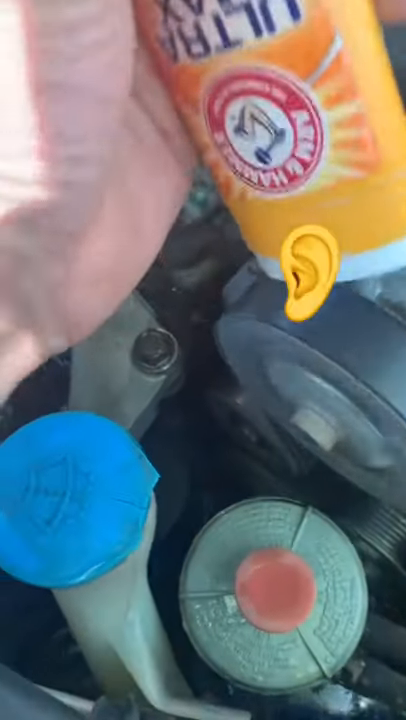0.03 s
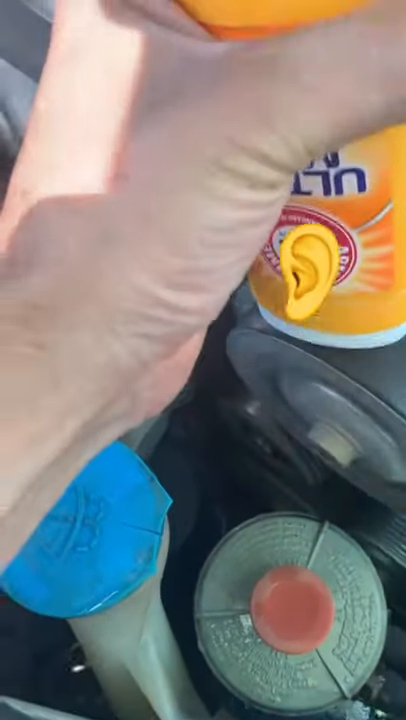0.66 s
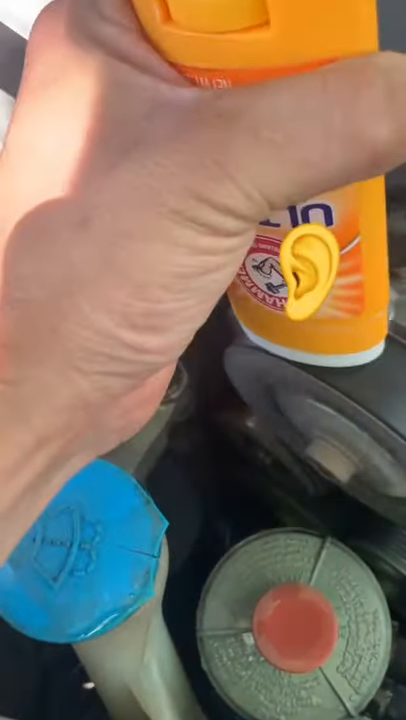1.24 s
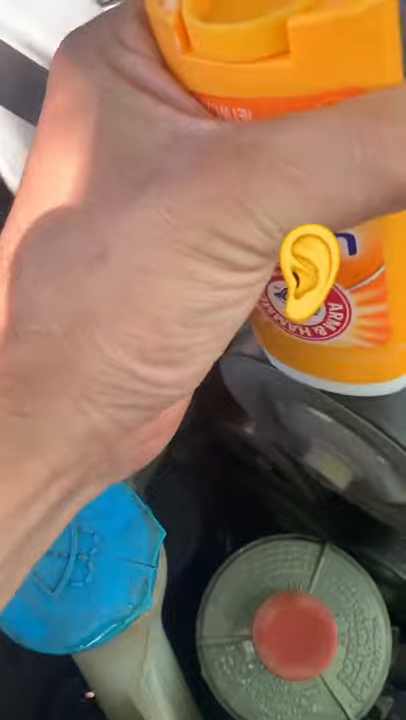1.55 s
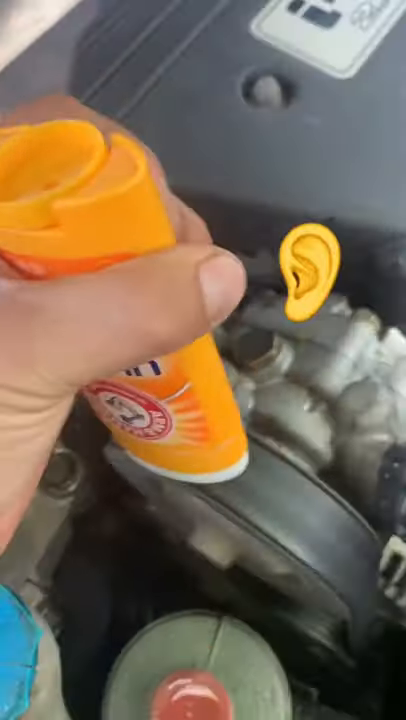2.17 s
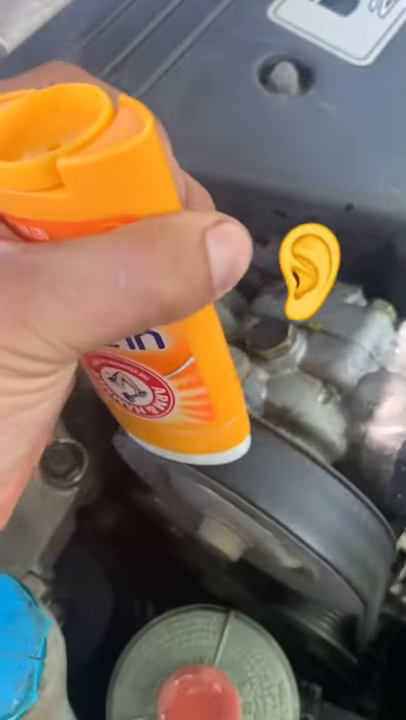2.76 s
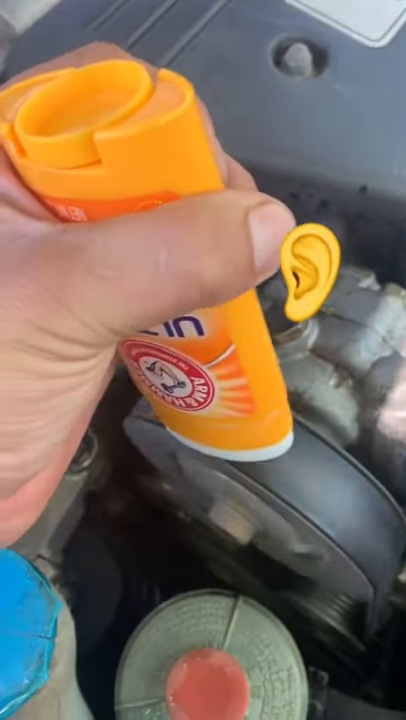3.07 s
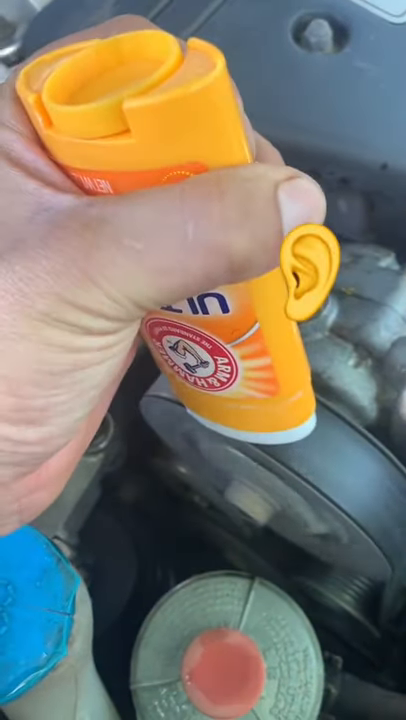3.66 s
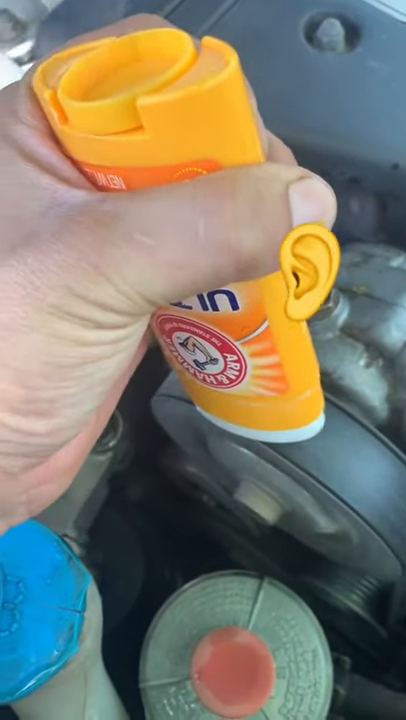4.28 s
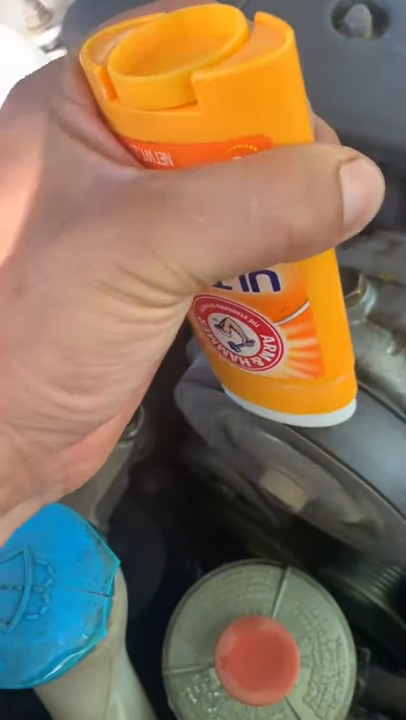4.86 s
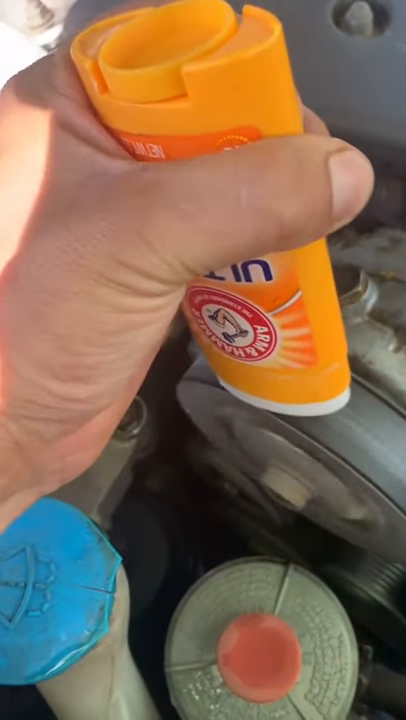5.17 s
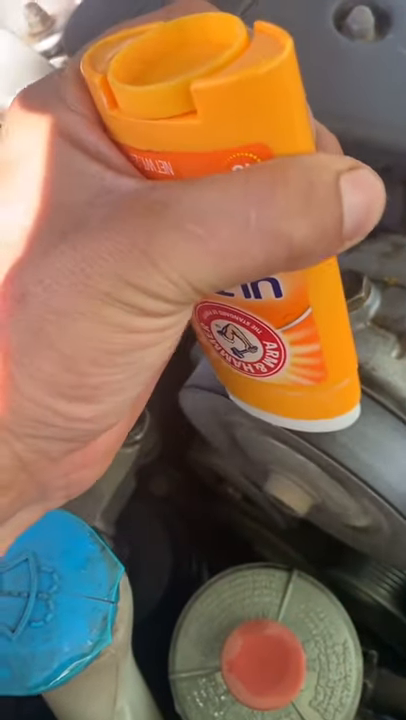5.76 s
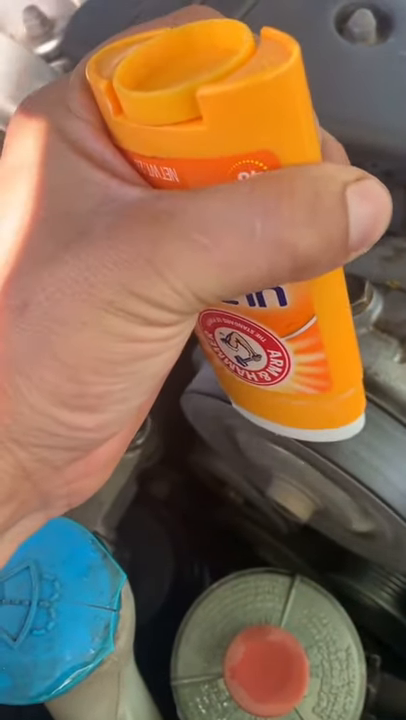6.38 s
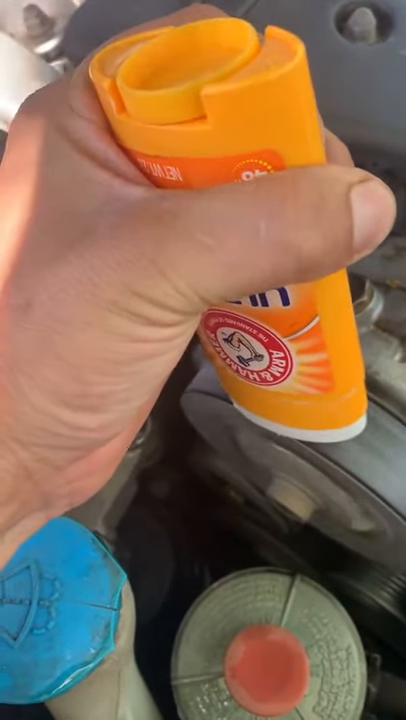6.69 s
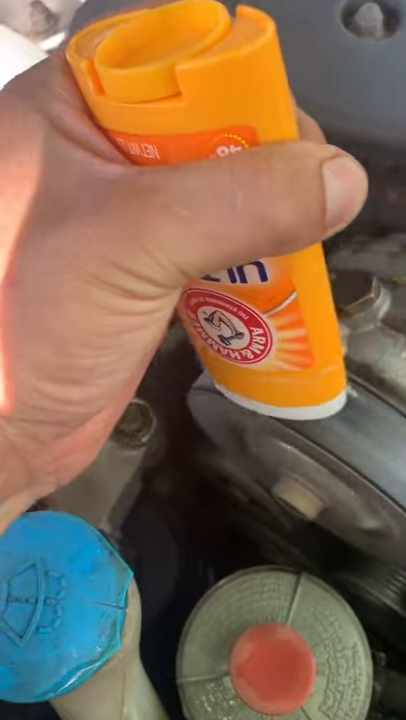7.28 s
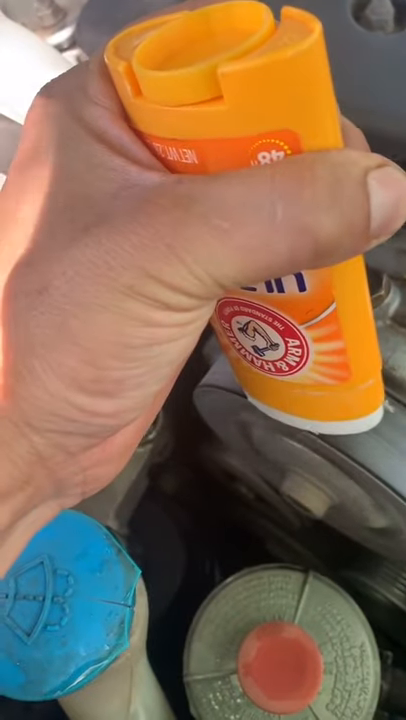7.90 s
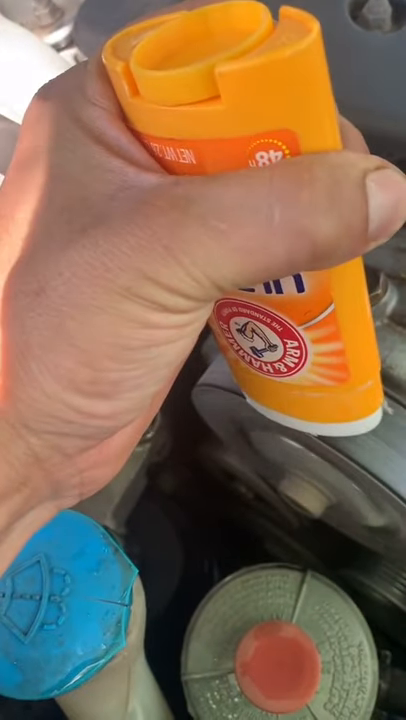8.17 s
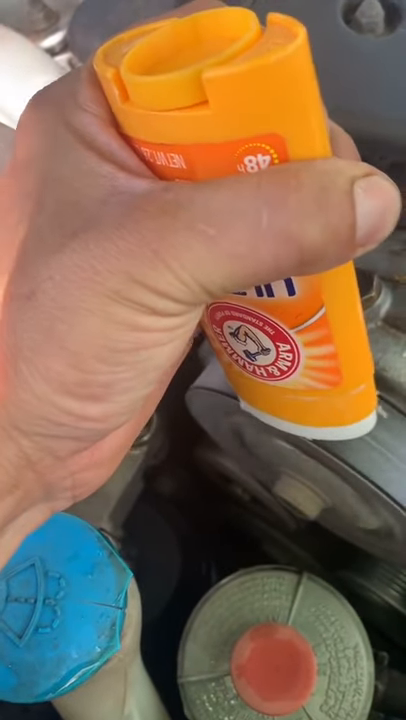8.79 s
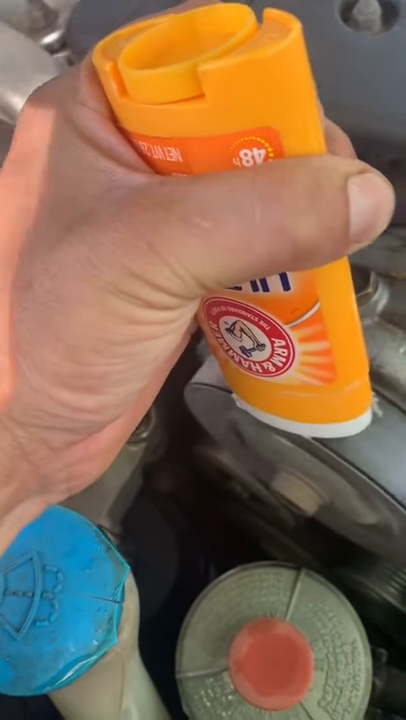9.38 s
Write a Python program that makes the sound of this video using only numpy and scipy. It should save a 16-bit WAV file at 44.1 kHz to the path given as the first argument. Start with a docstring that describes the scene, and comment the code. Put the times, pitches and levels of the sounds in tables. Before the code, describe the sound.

A car engine idles close by throughout, with fast injector ticking, lightly rattling covers, a pulley whirr, a low hum and a steady belt hiss. From the start, the dry drive belt chirps in rapid, irregular, very high squeaks with a thin rasp around them. They are strongest in the first two seconds, weaken, turn sparse after about 4.7 seconds and are gone by 5.5. A wax stick held against the belt scuffs once each lap, five or six times a second, a rough, slightly hollow sound that continues to the end. Now and then the stick catches with a small knock, more often after 4 seconds and most clearly between 7 and 8.5. The engine grows gradually louder from about 2 seconds on. Soft, low puffs of air buffet the microphone around 5.6 to 6.6 seconds, then more strongly from 9 to 9.5.

```python
"""Close above an open engine bay, a four-cylinder car engine idles while a waxy stick is held on its belt.
The dry belt chirps on its pulley in rapid stick-slip squeaks that die away as the wax spreads.
Once a lap a rough stretch of belt scuffs under the stick, and hard catches make the stick knock.
Behind this, injectors tick, covers rattle, pulleys whirr, an accessory hums and the belt hisses.
The engine grows louder as a hand uncovers it; late on, puffs of air buffet the microphone."""
import sys
import numpy as np
from scipy import signal
from scipy.fft import rfft, irfft, next_fast_len
from scipy.io import wavfile
from scipy.ndimage import uniform_filter1d

SR = 44100
rng = np.random.default_rng(int(sys.argv[2]) if len(sys.argv) > 2 else 0)


def store_wav(level_fs):
    """Save 16-bit WAV to argv[1]."""
    pcm = np.round(np.clip(np.atleast_2d(level_fs), -1, 1) * 32767)
    wavfile.write(sys.argv[1], SR, pcm.T.astype(np.int16))


N = 420713
TIME = np.arange(N) / SR
STICK_S = .012   # a belt rib sticks this long before each squeak

# The clear squeaks of the belt. Each row: start in seconds, length in seconds, relative level in dB,
# pitch in Hz.
SQUEAKS = [(0.015, 0.068, -28.5, 7390), (0.05, 0.025, -31.5, 10300), (.088, 0.021, -19.5, 7450),
           (0.114, 0.023, -27, 7700), (0.131, 0.057, -26.5, 8880), (0.197, 0.016, -21, 7530),
           (0.212, 0.036, -24.5, 8050), (0.247, 0.038, -20.5, 7490), (0.313, 0.029, -19.5, 7520),
           (0.343, 0.029, -28.5, 9900), (0.387, 0.044, -20, 7880), (0.452, 0.048, -20, 7410),
           (0.524, 0.025, -21, 7570), (0.551, 0.05, -24.5, 7740), (0.597, 0.026, -17, 7580),
           (0.644, 0.016, -17, 7500), (0.664, 0.03, -20, 7400), (0.727, 0.013, -19.5, 7540),
           (0.741, 0.027, -22, 7060), (0.777, 0.053, -21.5, 7660), (0.841, 0.039, -27, 7750),
           (0.913, 0.037, -21, 7540), (0.96, 0.05, -25, 8300), (1.002, 0.037, -31.5, 9900),
           (1.035, 0.025, -22.5, 7530), (1.095, 0.047, -29.5, 8400), (1.153, 0.016, -21.5, 7670),
           (1.173, 0.0055, -16, 7700), (1.184, 0.017, -31.5, 9150), (1.223, 0.033, -22.5, 7300),
           (1.252, 0.017, -32, 9300), (1.286, 0.048, -21.5, 7390), (1.359, 0.029, -24, 7540),
           (1.443, 0.012, -19.5, 7580), (1.458, 0.0048, -19, 7600), (1.481, 0.012, -16.5, 7800),
           (1.496, 0.033, -22.5, 7350), (1.54, 0.045, -23, 7490), (1.583, 0.013, -29, 7370),
           (1.597, .018, -35, 9600), (1.617, 0.045, -28.5, 7800), (1.759, 0.023, -24.5, 7560),
           (1.801, 0.031, -28, 8830), (1.837, 0.035, -26, 7700), (1.873, 0.018, -21.5, 7550),
           (1.919, 0.045, -35, 8640), (2.005, 0.0083, -20.5, 8200), (2.058, 0.026, -25, 7360),
           (2.127, 0.035, -29.5, 8040), (2.157, 0.014, -25, 8370), (2.196, 0.031, -25.5, 7500),
           (2.268, .029, -30.5, 8480), (2.329, 0.037, -25, 7330), (2.384, 0.042, -26.5, 8370),
           (2.454, .045, -36, 8600), (2.52, 0.034, -37.5, 8500), (2.604, 0.013, -26.5, 8600),
           (2.643, .034, -34.5, 8900), (2.709, 0.023, -25, 8700), (2.75, 0.03, -32, 8860),
           (2.827, 0.023, -29, 8600), (2.891, 0.034, -27, 7700), (2.965, 0.03, -28.5, 8600),
           (3.033, 0.034, -29, 8040), (3.044, .005, -25, 7670), (3.099, 0.026, -31, 8500),
           (3.151, 0.035, -28.5, 8120), (3.189, .006, -21, 7480), (3.21, 0.034, -30, 8540),
           (3.244, 0.005, -20.5, 7640), (3.423, 0.04, -28, 8200), (3.468, 0.052, -35, 9100),
           (3.542, 0.018, -27, 7800), (3.594, 0.014, -21.5, 7420), (3.697, 0.019, -31, 10000),
           (3.735, 0.023, -22, 7680), (3.794, 0.049, -29.5, 8230), (3.872, 0.03, -34, 8800),
           (3.951, 0.014, -22.5, 7730), (3.966, 0.063, -28, 7980), (4.028, 0.0082, -24, 9110),
           (4.118, 0.038, -33, 8500), (4.168, 0.018, -24.5, 7160), (4.201, .012, -36, 9700),
           (4.237, 0.018, -23.5, 9800), (4.254, 0.0073, -21, 7320), (4.305, .005, -21, 8000),
           (4.313, 0.027, -25.5, 8300), (4.38, 0.023, -22.5, 7660), (4.447, 0.012, -23.5, 7500),
           (4.529, 0.018, -27, 7660), (4.566, 0.012, -24, 7550), (4.587, 0.007, -18, 7700),
           (4.626, 0.042, -27.5, 7800), (4.824, 0.048, -38, 7930), (5.169, 0.014, -32.5, 9300),
           (5.348, 0.0051, -22.5, 7510), (5.402, 0.029, -32, 8500)]


def slips(firm_db=-25.2, strays_per_s=26, stray_s=0.0218, fade_db_per_s=5, waxed_s=4.3):
    """Stick-slip motion: ribs grip and let go. Lists squeaks, releases and strays as SQUEAKS rows."""
    # as a firm squeak lets go, the rib jumps to a higher, fainter note
    release_hz = 9370 + 490 * rng.uniform(-1.14, 1, size=200)
    releases = [(start + length, min(0.0223, length), db - 13.5, hz)
                for (start, length, db, _), hz in zip(SQUEAKS, release_hz) if db > firm_db]
    # faint stray slips in the pauses die away as the wax spreads
    starts, lengths = np.transpose(SQUEAKS)[:2]
    late, higher = rng.uniform(-1, 1, size=(200, 2)).T
    times = (np.arange(len(late)) + 1 + late / 2) / strays_per_s
    strays = []
    for s, hz in zip(times, 9400 + 544 * higher):
        crowded = np.any((s + stray_s + STICK_S > starts) & (s < starts + lengths / 2))
        if s < waxed_s and not crowded:
            strays.append((s, stray_s, -28.5 - fade_db_per_s * s, hz))
    return SQUEAKS + releases + strays


# Friction noise round a squeak. Each row: frequency in Hz, relative spectral level in dB.
RASP_SPECTRUM = [(4500, -39), (5600, -30), (6500, -10), (7200, 29.5), (8200, 26), (9300, 13), (10100, 6),
                 (11300, -35), (12400, -30), (13500, 13), (14000, 6), (14700, -14), (15500, -7)]


def squeaks(attack_s=0.0029, edge_s=0.0022, light_above_hz=8950, flick_hz_per_s=37000):
    """Self-excited oscillation: each slip sets a rib squealing; uneven grip adds width and rasp."""
    tone, grip = np.zeros(N), np.zeros(N)
    t = np.arange(2 ** 12) / SR
    offset_hz = np.fft.fftfreq(len(t), 1 / SR)
    for (start, length, db, hz), draws in zip(slips(), rng.standard_normal(size=(300, 2, len(t)))):
        kicks = draws[0] + 1j * draws[1]
        # a firm slip locks into a narrow band, which widens for weaker slips and as the wax spreads
        half_width_hz = 0.55 * (430 + 66 * max(-21.5 - db, 0) + 27 * start)
        swing = level_out(np.fft.ifft(kicks / np.hypot(1, (offset_hz / half_width_hz) ** 2)), 0.027)
        # a lightly gripping rib squeals high and flicks upwards
        pitch = hz + (hz > light_above_hz) * flick_hz_per_s * (t - length / 2)
        squeal = swing * np.exp(2j * np.pi * np.cumsum(pitch) / SR)
        sag_db = -0.5 * (np.minimum(t / length, 1) - .5)
        ramps = np.minimum(t / min(attack_s, length / 2), (length + edge_s - t) / edge_s)
        envelope = from_db(db + sag_db) * np.clip(ramps, 0, 1)
        at = max(int((start - edge_s) * SR), 0)
        tone[at:at + len(t)] += np.sqrt(2) * envelope * (squeal + from_db(-23) * squeal ** 2).real
        grip[at:at + len(t)] += envelope ** 2
    chatter = rms_one(from_db(4 * drift(700)))
    rasp = np.sqrt(grip) * chatter * noise(RASP_SPECTRUM)
    return from_db(-3.5) * tone + from_db(-8) * rasp


# Three pulley resonances and, last, a thin, very high ring that sounds with the squeaks.
# Each row: frequency in Hz, bandwidth in Hz, gain in dB.
SQUEAK_RINGS = [(7310, 113, -3.5), (7550, 150, -7.5), (9020, 510, -1), (15340, 60, 9)]


def squeak_ring(squeal):
    """Resonance: narrow bands ring along with the squeaks."""
    return sum(resonate(squeal, [mode]) for mode in SQUEAK_RINGS)


# Brief, clean high whistles. Each row: start in seconds, length in seconds, level in dB.
CLEAN_WHISTLES = [(2.695, 0.033, -26), (2.894, 0.034, -25), (2.951, 0.066, -31), (3.04, 0.014, -31),
                  (3.088, .036, -42), (3.149, 0.026, -29)]


def clean_whistle(pitch_hz=7752, edge_s=0.0037, octave_db=-22):
    """Gated harmonic tone: brief, clean high whistles on one steady note among the squeaks."""
    envelope = sum(from_db(db) * np.clip(np.minimum(TIME - s, s + length - TIME) / edge_s + .5, 0, 1)
                   for s, length, db in CLEAN_WHISTLES)
    phase = 2 * np.pi * pitch_hz * TIME
    return np.sqrt(2) * envelope * (np.sin(phase) + from_db(octave_db) * np.sin(2 * phase))


# The ribs rub until the wax takes hold. Each row: time in seconds, level in dB.
RUB_LEVEL = [(0, -45), (.6, -46), (1.7, -46), (2.4, -42.5), (3.3, -48), (4.3, -37), (4.75, -53), (5.6, -62)]
# The noise of that rubbing. Each row: frequency in Hz, relative spectral level in dB.
RUB_SPECTRUM = [(5600, -42), (6800, -7), (7800, 3.5), (8500, 7), (9400, -2), (10100, 3), (10700, -39),
                (12000, -40)]


def rubbing(grab_db=4.0, grain_db=3.5, stuck_db=-12):
    """Dry friction: ribs rasp on the pulley in tiny uneven grabs, hushed while a rib sticks."""
    level_db, = in_time(RUB_LEVEL)
    stuck = np.zeros(N)
    for start, *_ in SQUEAKS:
        stuck[max(int((start - STICK_S) * SR), 0):int(start * SR)] = 1
    grabs = rms_one(from_db(grab_db * drift(70) + grain_db * drift(800)))
    return from_db(level_db + stuck_db * uniform_filter1d(stuck, size=90)) * grabs * noise(RUB_SPECTRUM)


# A rib snaps free. Each row: time in seconds, relative peak level in dB.
SNAPS = [(0.0836, -44), (1.4426, -42), (1.4815, -49), (3.046, -39), (3.741, -41), (3.9679, -37),
         (4.1749, -36.5), (4.2567, -35), (4.3044, -39), (4.531, -33.5), (4.5885, -36.5)]


def snaps(rise_s=0.0025, fall_s=0.014):
    """Elastic release: the rubber lets go with a short bright scratch."""
    force = swells([(s + rise_s, db, rise_s, fall_s) for s, db in SNAPS])
    scratch = noise([(5000, -14), (7500, 4), (11000, -1.5), (12400, -3), (13500, 3), (15500, -14)])
    return from_db(8) * force * scratch


# The rough stretch of belt meets the stick once a lap. Each row: time of the peak in seconds, relative
# peak level in dB, rise and fall time constants in seconds, brightness in dB.
SCUFFS = [(.018, -30.5, .009, .039, -2), (.205, -29, 0.019, 0.0089, -3), (.379, -33, .006, 0.039, 2),
          (.588, -36.5, 0.013, 0.011, 7), (.742, -32.5, .022, 0.017, 0.5), (.913, -26, .017, .02, 1.5),
          (1.075, -34, .006, .051, -2), (1.262, -26.5, 0.0068, 0.019, -3), (1.457, -28, 0.028, .012, 1.5),
          (1.622, -31.5, 0.034, 0.033, 1), (1.781, -29.5, .005, 0.035, -4.5), (1.97, -30.5, .021, 0.03, 1),
          (2.162, -33.5, .043, .025, -2), (2.322, -27.5, 0.014, .019, -2.5), (2.496, -28.5, .013, 0.014, 1),
          (2.682, -24.5, .01, 0.014, -1), (2.859, -25, .019, .023, -1), (3.039, -27.5, 0.023, .024, -4),
          (3.197, -27.5, .015, 0.038, 0), (3.385, -28, 0.02, 0.047, 1.5), (3.559, -24.5, 0.016, 0.019, 0),
          (3.745, -27.5, .023, .024, 1.5), (3.931, -28, 0.027, .013, 4), (4.099, -27.5, .03, .018, 0),
          (4.279, -28.5, .032, 0.039, -2.5), (4.456, -25, 0.011, 0.018, -3), (4.61, -28.5, .011, .033, 1),
          (4.787, -26.5, .005, .024, -1), (4.979, -24.5, .006, 0.017, -2), (5.159, -23.5, 0.02, 0.02, -2),
          (5.345, -29.5, .037, .018, 6), (5.516, -27.5, .012, .018, -0.5), (5.703, -29.5, .035, .012, -1),
          (5.862, -29, 0.029, 0.028, 1), (6.054, -27, 0.038, .008, 2), (6.204, -25, .008, .028, 2),
          (6.405, -33.5, .034, 0.019, 4), (6.585, -24.5, 0.024, 0.012, 0), (6.757, -25.5, .024, .03, 1),
          (6.931, -23.5, .006, 0.017, -1), (7.102, -25, .022, 0.025, 4), (7.303, -31.5, 0.051, .028, 0),
          (7.47, -27.5, 0.012, .018, -3), (7.642, -23.5, .021, 0.034, -0.5), (7.808, -22, 0.024, 0.03, -3),
          (7.991, -24.5, 0.023, 0.026, -1), (8.183, -24, 0.028, 0.016, -4), (8.36, -21, .011, 0.01, 2),
          (8.54, -28, 0.046, .036, -3), (8.708, -27, 0.033, .045, 4), (8.868, -29.5, .017, .018, -6),
          (9.048, -29.5, 0.016, .044, 7), (9.237, -22, 0.0089, .025, -2.5), (9.429, -26.5, .028, .018, 2)]
# The modes of the stick and its holder. Each row: frequency in Hz, bandwidth in Hz, relative gain in dB.
STICK_MODES = [(407, 71, -11.5), (658, 30.6, -2.5), (877.6, 33, 4.5), (988, 65, 1), (1120, 51, -6.5),
               (1250, 61, -5), (1319, 51, -2), (1650, 106, -6), (2198, 110, -15), (2685, 62, -16)]
# Dry friction noise of a scuff. Each row: frequency in Hz, relative spectral level in dB.
GRIT_SPECTRUM = [(200, -6), (400, -17), (750, -29), (1500, -35), (3000, 3.5), (4400, -1), (5100, -16),
                 (6300, 13.5), (7600, 4), (9500, -2), (11000, 2), (12500, -2), (15500, -35)]


def scuffs(slip_hz=440, jitter=.1, bright_above_hz=945, jolt_rise_s=0.0031, jolt_fall_s=0.0079):
    """Frictional excitation: the stick judders on the belt in uneven slips, ringing with its holder."""
    # the force swells once a lap and jolts at each catch
    jolts = [(s, db - 2.5, jolt_rise_s, jolt_fall_s) for s, db in CATCHES]
    force = swells([row[:4] for row in SCUFFS] + jolts)
    cycles = np.floor(np.cumsum(slip_hz * (1 + jitter * drift(250))) / SR)
    pulses = np.diff(cycles, prepend=0) * from_db(3.8 * rng.standard_normal(N))
    judder = rms_one(pulses) + 0.93 * rng.standard_normal(N)
    brightness = from_db(in_time(SCUFFS)[-1] + .5)
    modes = ((-1) ** k * resonate(judder, [mode]) * (brightness if mode[0] > bright_above_hz else 1)
             for k, mode in enumerate(STICK_MODES))
    ringing = level_out(sum(modes), 0.023)
    # the resonances shift a little as the stick rocks in the hand
    ringing = np.interp(TIME + np.cumsum(.018 * drift(9)) / SR, TIME, ringing)
    grit = noise(GRIT_SPECTRUM) * rms_one(from_db(0.65 * drift(500)))
    return force * (from_db(0.98) * ringing + from_db(-10.5) * grit)


# The stick catches hard on the belt. Each row: time in seconds, relative level in dB.
CATCHES = [(0.912, -28.5), (1.621, -31), (2.31, -25), (2.859, -35.5), (4.089, -26.5), (4.269, -26.5),
           (4.427, -24.5), (4.784, -28), (4.793, -31), (4.971, -23), (5.492, -22.5), (5.701, -33),
           (6.385, -26), (7.132, -22.5), (7.313, -22.5), (7.454, -18.5), (8.163, -24), (8.325, -23.5),
           (9.208, -34)]


def knocks():
    """Impulse response: each catch strikes the stick once, and its modes decay freely."""
    s, db = np.transpose(CATCHES)
    blows = np.zeros(N) + 1e-18
    blows[(s * SR).astype(int)] = from_db(db + 27)
    return resonate(blows, STICK_MODES)


# The engine comes forward as the hand uncovers it. Each row: time in seconds, relative level in dB.
ENGINE_LEVEL = [(0.0, -37.5), (0.16, -38.5), (2.13, -39.5), (3.0, -37), (8.61, -32), (9.54, -31)]
# Mechanical noise of the engine. Each row: frequency in Hz, relative spectral level in dB.
ENGINE_SPECTRUM = [(20, -20), (45, -10), (65, 10.5), (110, -2), (200, 0.5), (310, -5.5), (400, 1),
                   (580, 1.5), (780, -3), (950, 0), (1120, 0), (1290, 1), (1420, 0), (1600, 2),
                   (1900, -0.5), (2450, -7.5), (2900, -7.5), (4400, -9), (5100, -40)]
# Turning shafts and pulleys. Each row: turns per second, modulation depth in dB.
SHAFTS = [(16.8, 2.0), (44.1, 1.3), (56.5, 1.3), (73.3, 1.5)]
# The modes of the engine's covers. Each row: frequency in Hz, bandwidth in Hz, relative gain in dB.
COVER_MODES = [(556.5, 11.3, 3.5), (682, 75, -3), (950.6, 33, 2.5), (1260, 115, -11), (2674, 21, -12.5)]


def engine(clatter_db=2.5):
    """Amplitude modulation: over broadband noise, the shafts rattle the covers in their own rhythms."""
    level_db, = in_time(ENGINE_LEVEL)
    throb = from_db(sum(db * np.sin(2 * np.pi * turns * TIME) for turns, db in SHAFTS))
    body = noise(ENGINE_SPECTRUM) * from_db(drift(60))
    rattle = rng.standard_normal(N) * throb * from_db(clatter_db * drift(150))
    covers = rms_one(resonate(rattle, COVER_MODES))
    return from_db(level_db) * (from_db(-2) * body + from_db(-7) * covers)


# The idle speed sags slightly under the drag. Each row: time in seconds, firings per second.
FIRING_RATE = [(0, 26.7), (5.8, 26.7), (6.6, 26.54), (7.4, 26.68), (8.6, 26.68), (9.54, 26.54)]
# Injector and valve clicks. Each row: position as a fraction of the firing period, relative level in dB.
CLICKS = [(0.01, -2), (0.26, -6), (0.68, -5.5)]
# The noise of a click. Each row: frequency in Hz, relative spectral level in dB.
CLICK_SPECTRUM = [(1800, -16), (2700, 0.5), (3600, -4.5), (4500, 4.5), (5100, -33), (6200, -5), (7500, 3),
                  (9000, 7), (10000, 9.5), (10600, -16), (11300, -6), (11800, -40), (12800, -40),
                  (13400, 0), (15500, 4)]


def injectors(first_s=0.0127, tick_hz=4332, tick_fall_s=0.011, click_fall_s=.004):
    """Periodic impacts: each firing brings dry clicks and a ringing tick from four unequal injectors."""
    firings_per_s, = in_time(FIRING_RATE)
    firing, phase = np.divmod(np.cumsum(firings_per_s) / SR - first_s * firings_per_s, 1)
    cylinder_db = np.array([-3.0, -3.5, 1.5, -2.0])[firing.astype(int) % 4]
    strength = from_db(cylinder_db + 2.0 * drift(20))
    strike = rms_one(strength * np.exp(-phase / firings_per_s / tick_fall_s))
    ticks = uniform_filter1d(strike, size=40) * narrow_noise(tick_hz, width_hz=70, steady_s=0.0056)
    decays = sum(from_db(db) * np.exp(-((phase - position) % 1) / firings_per_s / click_fall_s)
                 for position, db in CLICKS)
    clicks = rms_one(strength * decays) * noise(CLICK_SPECTRUM)
    # these come forward faster than the rest as the hand uncovers the engine
    level_db, = in_time(ENGINE_LEVEL)
    heard_db = level_db.mean() + 1.24 * (level_db - level_db.mean())
    return from_db(heard_db) * (from_db(-17) * ticks + from_db(-10.5) * clicks)


# The hum of engine and accessories. Each row: frequency in Hz, relative level in dB.
HUM_LINES = [(26.7, -60), (53.4, -57.5), (80.1, -57), (250, -49), (372, -54.5), (555, -58.5)]


def hum(wander=0.00264):
    """Line spectrum: steady rotation gives tones, which waver slightly in level and pitch."""
    level_db, = in_time(ENGINE_LEVEL)
    uncovered = from_db(0.94 * (level_db - level_db.mean()))
    lines = np.zeros(N)
    for hz, db in HUM_LINES:
        amplitude = from_db(db + drift(5.8))
        lines += amplitude * np.sin(2 * np.pi * hz * np.cumsum(1 + wander * drift(6)) / SR)
    return np.sqrt(2) * uncovered * lines


# The resonance of a pulley bearing. Its one row: frequency in Hz, bandwidth in Hz, relative gain in dB.
BEARING_MODE = [(1660, 88, 0)]


def bearing_whirr():
    """Narrow-band resonance: a pulley bearing whirrs evenly."""
    level_db, = in_time(ENGINE_LEVEL)
    hz, width_hz, _ = BEARING_MODE[0]
    return from_db(level_db - 8.5) * narrow_noise(hz, width_hz, steady_s=0.051)


# Two faint, thin, very high steady tones. Each row: frequency in Hz, relative level in dB.
HIGH_TONES = [(11197, -19.5), (13954, -14.5)]


def high_tones():
    """Pure tones: two faint sinusoids waver in strength and grow with the overall level."""
    level_db, = in_time(ENGINE_LEVEL)
    tones = sum(from_db(db - 0.5 * drift(2.99)) * np.sin(2 * np.pi * hz * TIME) for hz, db in HIGH_TONES)
    return np.sqrt(2) * from_db(level_db + 0.97 * (level_db - level_db.max())) * tones


# The belt's hiss and its highest fizz. Each row of both: frequency in Hz, relative spectral level in dB.
HISS_SPECTRUM = [(5100, -22.5), (5700, -0.5), (6400, 0), (7400, 5.5), (8100, 0.5), (9000, 4), (9900, 3),
                 (10500, -29), (11300, 2.5), (12400, -86)]
FIZZ_SPECTRUM = [(12400, -42), (13300, 5.5), (14000, -1), (14700, 3), (15500, 5.5)]
# The strength of the fizz. Each row: time in seconds, relative level in dB.
FIZZ_LEVEL = [(0.0, -51.5), (0.74, -49), (1.09, -56.5), (3.4, -57), (4.09, -47), (5.61, -50), (7.65, -42.5),
              (9.54, -44.5)]


def belt_hiss():
    """Sliding friction: the ribs run hissing through the pulley grooves."""
    level_db, = in_time(ENGINE_LEVEL)
    fizz_db, = in_time(FIZZ_LEVEL)
    hiss = from_db(level_db - 5.5) * noise(HISS_SPECTRUM)
    fizz = from_db(fizz_db + 5.8) * noise(FIZZ_SPECTRUM)
    return (hiss + fizz) * from_db(drift(120))


# Puffs of air. Each row: time of the peak in seconds, level in dB, Gaussian half-width in seconds.
BUFFETS = [(5.627, -37, .014), (5.99, -42, .022), (6.557, -34.5, 0.018), (6.615, -40, .012),
           (8.92, -48, 0.018), (8.961, -31, 0.01), (9.003, -35, 0.015), (9.241, -24, 0.0083),
           (9.279, -26, .011), (9.335, -36, .02), (9.53, -34, 0.017)]
# The rumble of a puff. Each row: frequency in Hz, relative spectral level in dB.
BUFFET_SPECTRUM = [(20, -31), (50, -10), (80, -6), (140, -12.5), (250, -22), (450, -44), (1000, -80)]


def buffets(side_db=-8):
    """Turbulent pressure: soft low puffs of air, a little different at each microphone port."""
    gusts = sum(from_db(db) * np.exp(-.5 * ((TIME - s) / half) ** 2) for s, db, half in BUFFETS)
    mid, side = (level_out(noise(BUFFET_SPECTRUM), 0.025) for _ in range(2))
    return gusts * (mid + from_db(side_db) * side * [[1], [-1]])


def engine_bay(x, width, spread_s):
    """Reflection: echoes reach the two sides differently, each frequency with its own short delay."""
    size = next_fast_len(N + 4096)
    hz = np.arange(size // 2 + 1) * SR / size
    knots = np.arange(0, SR / 2, 25)
    delay_s = spread_s * np.interp(hz, knots, rng.uniform(.2, 1, len(knots)))
    scattered = irfft(rfft(x, size) * np.exp(-2j * np.pi * np.cumsum(delay_s) * SR / size), size)[:N]
    return x + colour(scattered, width) * [[1], [-1]]


def from_db(db):
    """The amplitude ratio of a level in decibels."""
    return 10 ** (np.asarray(db) / 20)


def rms_one(x):
    """Normalisation to unit mean power."""
    return x / np.sqrt(np.mean(np.abs(x) ** 2) + 1e-20)


def level_out(x, seconds):
    """Amplitude limiting, as friction limits its own swing: the short-term power stays near 1."""
    return x / np.sqrt(uniform_filter1d(np.abs(x) ** 2, max(int(seconds * SR), 2)) + 1e-12)


def in_time(rows):
    """Linear interpolation of each column after the time column, at every sample."""
    s, *columns = np.transpose(rows)
    return [np.interp(TIME, s, column) for column in columns]


def drift(per_s):
    """Random modulation of unit power, with per_s new values a second."""
    knots = rng.standard_normal(N // 20)
    return rms_one(np.interp(TIME * per_s, np.arange(len(knots)), knots))


def swells(rows):
    """Exponential growth and decay. Each row: peak in seconds, level in dB, rise and fall in seconds."""
    force = np.zeros(N)
    for s, db, rise, fall in rows:
        near = slice(max(int((s - 10 * rise) * SR), 0), int((s + 10 * fall) * SR))
        force[near] += from_db(db) * np.exp(-np.maximum((s - TIME[near]) / rise, (TIME[near] - s) / fall))
    return force


def colour(x, points):
    """Spectral shaping by (Hz, dB) points, falling 12 dB an octave beyond the ends."""
    size = next_fast_len(N + 4096)
    hz = np.maximum(np.arange(size // 2 + 1) * SR / size, 1)
    knots, db = np.transpose(points)
    gain = from_db(np.interp(np.log(hz), np.log(knots), db))
    roll_off = np.minimum(hz / knots[0], 1) ** 2 * np.minimum(knots[-1] / hz, 1) ** 2
    return irfft(rfft(x, size) * gain * roll_off, size)[..., :N]


def noise(points):
    """Gaussian noise of unit power, shaped by (Hz, dB) points."""
    return rms_one(colour(rng.standard_normal(N), points))


def resonate(x, modes):
    """Modal superposition: parallel resonators (Hz, bandwidth in Hz, dB) with alternating signs."""
    out = 0
    for k, (hz, width, db) in enumerate(modes):
        r = np.exp(-np.pi * width / SR)
        ring = signal.lfilter([1, 0, -1], [1, -2 * r * np.cos(2 * np.pi * hz / SR), r * r], x)
        out = out + (-1) ** k * from_db(db) * (1 - r * r) / 2 * ring
    return out


def narrow_noise(hz, width_hz, steady_s):
    """Random excitation: noise passes twice through one resonance and is held at an even strength."""
    mode = [(hz, width_hz, 0)]
    return level_out(resonate(resonate(rng.standard_normal(N), mode), mode), steady_s)


# Stereo width of the close friction and of the idling engine. Each row of both: frequency in Hz, level
# of the side signal against the mid in dB.
FRICTION_WIDTH = [(300, -17), (900, -23.5), (1200, -11), (1500, -30), (2600, -5), (6000, -16),
                  (7500, -23.5), (9000, -21), (11500, -20), (16000, 0)]
IDLE_WIDTH = [(10, -18), (120, -20), (250, -21), (400, -13), (650, -17), (950, -17.5), (1200, -13.5),
              (1500, -23), (2000, -14), (2600, -5), (4500, -9), (7700, -10), (8400, -3), (16000, -4)]


def scene():
    """Superposition: belt and engine sound together in the engine bay."""
    idle = engine() + injectors() + hum() + bearing_whirr() + high_tones() + belt_hiss()
    squeal = squeaks()
    friction = squeal + squeak_ring(squeal) + clean_whistle() + rubbing() + snaps() + scuffs() + knocks()
    foreground = engine_bay(friction, FRICTION_WIDTH, spread_s=0.0066)
    background = engine_bay(idle, IDLE_WIDTH, spread_s=0.037)
    return foreground + background + buffets()


def record(dry):
    """Directivity: the balance tips slightly right as the microphone turns; a low-pass cuts the top."""
    right_db = np.interp(TIME, [3.5, 4.5], [0, .3])
    balanced = dry * from_db(right_db * [[-1], [1]])
    return signal.sosfilt(signal.ellip(12, .1, 90, 15800, fs=SR, output="sos"), balanced)


dry = scene()
out = record(dry)
store_wav(out)
```